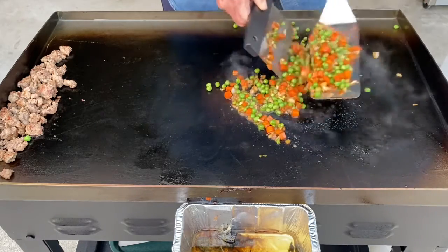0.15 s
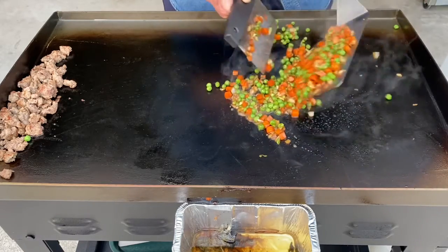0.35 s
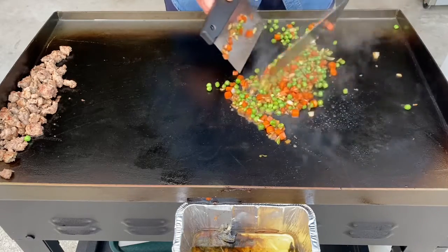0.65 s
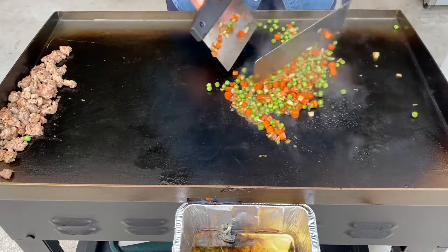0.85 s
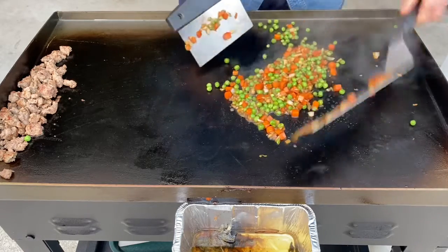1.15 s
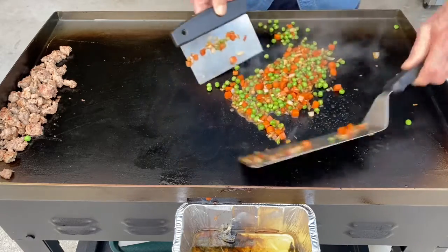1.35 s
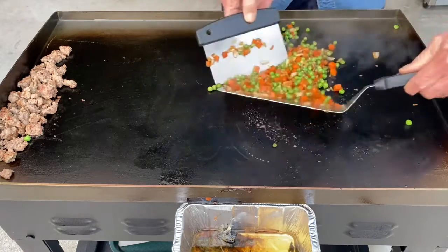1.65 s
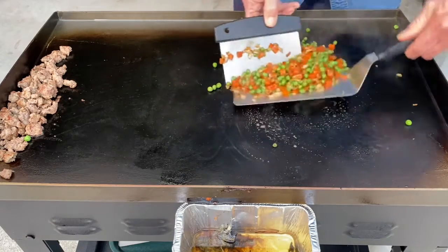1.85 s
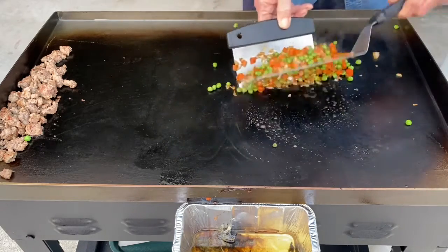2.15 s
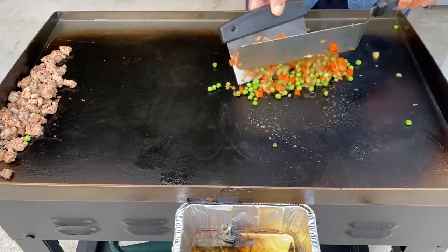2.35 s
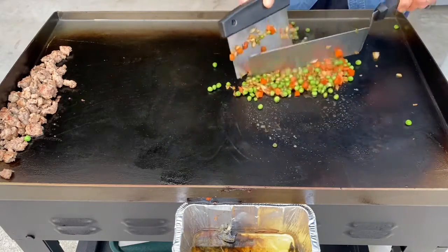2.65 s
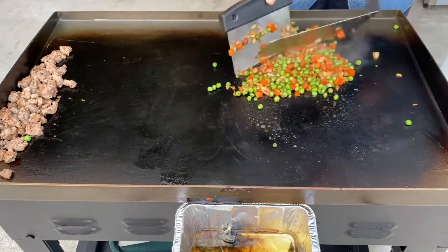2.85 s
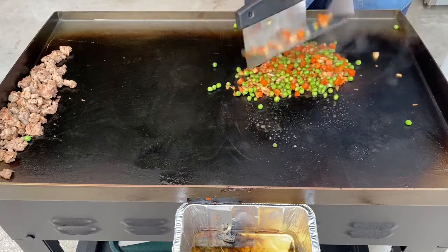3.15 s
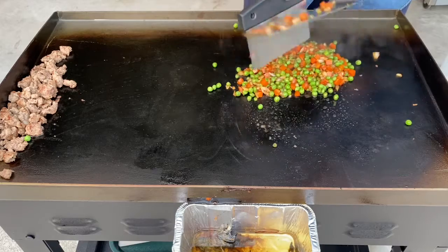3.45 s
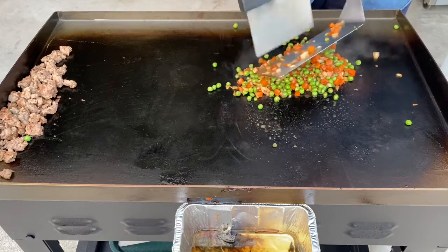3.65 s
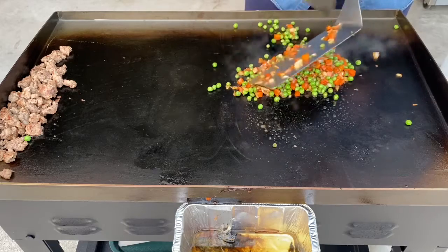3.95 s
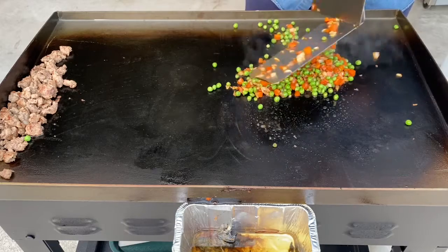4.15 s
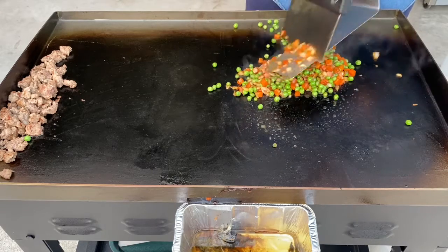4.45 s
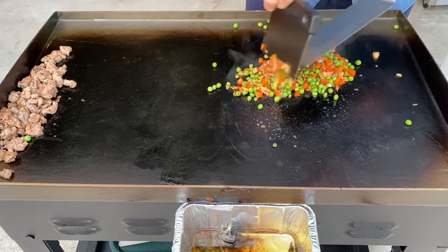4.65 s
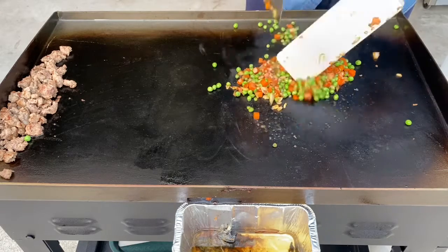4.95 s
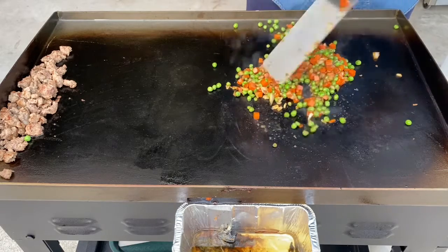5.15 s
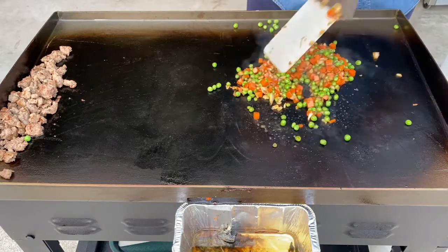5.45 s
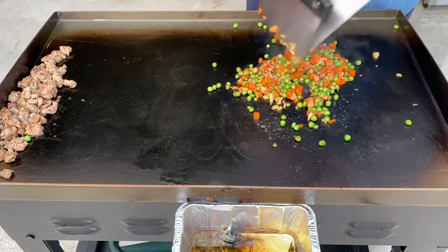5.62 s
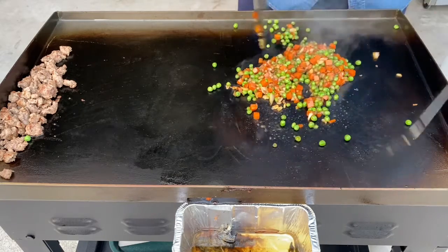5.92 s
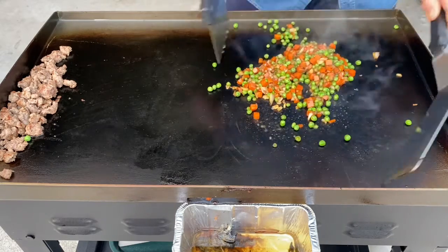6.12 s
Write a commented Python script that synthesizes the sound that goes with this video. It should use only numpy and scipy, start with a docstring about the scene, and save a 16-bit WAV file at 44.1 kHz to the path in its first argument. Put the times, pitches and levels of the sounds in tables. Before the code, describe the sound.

A close stereo pickup of an outdoor gas griddle. Steady steam hiss and fine fat crackle run throughout over a quiet, deep burner rumble, with dry pops scattered on top. The sizzle starts lively, with a flare at 0.2 seconds. At 1.2 a blade clanks down and a rough, gritty scrape begins, droning in the middle range, then squealing upward around 1.4 to 1.6; another clank lands at 1.75, with small slips until 2.0. The hiss thins as the food is heaped, flaring again near 2.5. Hard, short chops strike at 2.97 and, loudest, 3.4, with a faint tink and gritty swishes between. Drier taps come at 4.0 and 4.5, with thin tinks. Soft pats fall around 5, taps and tinks follow at 5.2 to 5.5, and two ringing steel clangs at 5.9 and 6.07 fade into sizzle and a last bright swish.

```python
"""Food sizzles on a gas flat-top griddle outdoors: steam hisses and fat crackles over a low burner rumble.
Then a long spatula and a bench scraper chop, scrape and tink; late on they clang on the ringing steel plate.
Hiss, crackle, rumble and scraping are noise filtered to a tone colour, made steady or in tiny bursts.
Blades and plate ring as sums of fading sine waves; a droning, squealing blade is a rough narrow tone."""
import sys
import numpy as np
from scipy import signal
from scipy.fft import rfft, irfft, next_fast_len
from scipy.io import wavfile
from scipy.ndimage import uniform_filter1d

SR = 44100
rng = np.random.default_rng(int(sys.argv[2]) if len(sys.argv) > 2 else 0)


def persist_wave(psi):
    """Save psi, clipped to +-1, as 16-bit WAV."""
    counts = np.round(np.clip(psi, -1, 1) * 32767).astype(np.int16)
    wavfile.write(sys.argv[1], SR, np.atleast_2d(counts).T)


N = 276931
T = np.arange(N) / SR

# In every table and name, t60 is the time in which a sound fades by 60 dB.
# Tone colours of noise; only their shapes matter: (frequency [Hz], level per Hz [dB])
BURNER_COLOUR = [(28, -43), (40, -11), (60, -5.5), (82, -0.5), (106, 0.5), (130, -1), (170, -8),
                 (260, -17.5), (500, -16), (1200, -25)]
STEAM_COLOUR = [(150, -8.5), (350, -5.5), (700, -4), (1200, -3), (2200, -0.5), (3300, -1), (5000, 1.5),
                (6200, 0.5), (8000, -2), (11000, -1.5), (16000, -7.5)]
FAT_COLOUR = [(300, -13), (1000, 1.5), (3000, -2), (5500, -5.5), (7000, 0.5), (11000, 1.5), (16000, 4)]
SCRAPE_COLOUR = [(120, -17), (300, 4), (600, -4), (750, 12.5), (900, -5), (1120, 6), (1600, 8), (2600, 3.5),
                 (4500, 1.5), (7000, -6.5), (10000, -28), (16000, -1)]
BLOW_COLOUR = [(60, -23), (150, -19), (300, -3), (600, 1.5), (1200, 0), (2000, -0.5), (3000, -4.5),
               (5000, -8.5), (8000, -6.5), (12000, -10.5), (16000, -22)]

# Turned food meets fresh hot steel and flares up: (time [s], steam level [dB], fat level [dB])
FLARES = [(.2, -45, -46), (2.47, -46, -45), (3.0, -57, -48.5), (4.02, -61, -45.5), (4.28, -65, -51.5),
          (5.22, -52, -44.5), (5.62, -56, -47), (6.05, -48, -47)]
# The loudest drops burst: (time [s], level before POP_GAIN_DB [dB])
POPS = [(0.6814, -26), (0.7913, -22), (2.4605, -25.5), (2.4968, -24.5), (2.6913, -24.5), (2.7766, -29),
        (3.5103, -27.5), (3.714, -27), (4.148, -33), (4.3116, -26.5), (4.4819, -24), (4.9555, -25)]
# Tossed pieces land softly on the plate: (time [s], level before a shared lift of 4 dB [dB])
PIECES = [(4.909, -43.5), (4.924, -49), (5.022, -44), (5.822, -37), (5.852, -43.5)]
# The edge slips through wet food or squeaks on steel:
# (middle time [s], level [dB], length [s], centre frequency [Hz])
SLIPS = [(1.84, -41, 0.03, 3200), (1.892, -36.5, .009, 2820), (1.944, -40, 0.014, 3070),
         (2.032, -43.5, 0.018, 2650), (3.039, -44.5, 0.039, 6260), (3.118, -37, .028, 14000),
         (3.45, -37, 0.075, 6700), (3.485, -44, 0.0049, 6850), (4.513, -45, .038, 7000),
         (6.275, -36.5, 0.055, 9100)]
# Ringing of the steel plate and, from 4995 Hz up, of the blade that strikes it:
# (frequency [Hz], level [dB], t60 [s])
STEEL_MODES = [(256, -4, .75), (452, -13, .7), (488, -7, .55), (603, -7, .36), (678, -6, .45),
               (737, -3, .45), (795, -9, .95), (899, -9, .45), (942, -10, .5), (1039, -13, .6),
               (1120, -3, .55), (1219, -1, .5), (1270, -2, .42), (1357, -4, .45), (1410, -5, .35),
               (1497, -5, .4), (1640, -4, .4), (1876, -7, .42), (2369, -14, .3), (3278, -17, .27),
               (3688, -16, .22), (4995, -8, .15), (7540, 0, .13), (8344, -2, .13), (9210, 0, .13)]
# Ringing of the blades when free: (frequency [Hz], level [dB], t60 [s])
SPATULA_MODES = [(1210, -10.5, 0.21), (1520, -18, 0.29), (1955, -3.5, 0.68), (3010, 0, 0.11),
                 (4870, -5.5, 0.17), (6960, 1, 0.19), (7400, -8.5, 0.18), (9400, 6, 0.13), (9530, 5, 0.062),
                 (11000, 2, 0.062), (13100, 3, 0.082)]
SCRAPER_MODES = [(1446, -4.5, 0.33), (2390, -0.5, 0.38), (6400, -6, 0.16), (9800, 5.5, 0.17),
                 (15500, 12, .05)]
# Blade touches blade: (time [s], click level [dB], spatula ring level [dB], scraper ring level [dB])
TINKS = [(3.131, -26.5, -70, -40), (4.532, -30, -58, -57), (4.547, -28, -34.5, -60), (5.523, -25, -40, -49),
         (5.547, -30, -37.5, -60)]
# A blade meets the plate; held against it, the blade gives a knock and a higher zing:
# (time [s], level [dB], bass tilt [dB], treble tilt [dB], edge tick level [dB], basic t60 [s],
#  knock [Hz], zing [Hz], pressed share [0-1], steel ring level [dB], rebound delay [s], 0 for none)
# All levels after the first are relative to the blow.
BLOWS = [ (1.193, -25.5, 1, 6.5, -4.5, 0.2, 1870, 4550, 0.03, -14.5, .03),
         (1.743, -23, -5.5, -7.5, -3, 0.31, 2020, 4040, 0.17, -13, 0.0011),
         (2.321, -40.5, -1, 10.5, -3, 0.14, 977, 2770, 0.07, -18, 0),
         (2.9714, -16, -1.5, 3.5, 11, 0.058, 498, 3180, 0.5, -31.5, .0105),
         (3.395, -12.3, -3, -0.5, 1, 0.054, 710, 6810, 0.41, -34, 0.011),
         (3.9894, -23.5, -4.5, 1.5, 12, 0.16, 1012, 10950, 0.53, -35, 0),
         (4.529, -30, -15.5, 0.5, 14, 0.19, 757, 1380, 0.36, -18, 0.0011),
         (5.193, -28, -3, 2.5, 14, 0.18, 410, 3480, 0.62, -37, 0),
         (5.252, -34.5, 5.5, 5.5, -8, 0.12, 1180, 2240, 0.46, -42, 0),
         (5.923, -17.5, 2, -8.5, -0.5, 0.28, 745, 1150, 0.01, -7.5, .02),
         (6.066, -18.5, -4, 7.5, -9, 0.25, 1103, 4440, 0.08, -6, .01)]
# A blade pressed edge-on to the plate: (frequency [Hz], level [dB])
PRESSED_MODES = [(475, -9.5), (640, -7), (1035, -1), (1270, -5), (2150, -6.5), (2800, -9.5), (3500, -8.5)]
# Strength of the difference between left and right: (frequency [Hz], level [dB])
WIDTH = [(60, -17.5), (300, -10), (800, -3.5), (2000, -2.5), (5500, 2.5), (6600, -4), (8000, 0),
         (9000, -18), (10000, 3), (11000, -19), (16000, 2)]
# Bands across which the two channels slip half a cycle apart: (start [Hz], end [Hz])
HALF_TURNS = [(7450, 8700), (9500, 10500), (11600, 12700), (13700, 14700)]

# The vegetables lie spread out, then are gathered into a heap that touches less steel and slowly dries.
# Starting levels, before the mix in sizzle(), and the change that the heap brings
STEAM_DB, FAT_DB = -40, -44
HEAP_STEAM_DB, HEAP_FAT_DB, DRYING_DB_PER_S = -9.5, -1.5, -0.76
GATHER_START_S, GATHER_LENGTH_S = 1.37, 0.9
FLARE_RISE_S, FLARE_T60_S = 0.078, 3.1
POP_GAIN_DB, SMALL_POPS_PER_S, SMALL_POP_DB = -2, 2.5, -33
SLIP_WIDTH_SHARE = 1  # of the centre frequency

# One long stroke of the spatula under the pile: it bears down, eases off steadily and lifts
STROKE_START_S, STROKE_ATTACK_S, STROKE_LENGTH_S, STROKE_RELEASE_T60_S = 1.189, 0.12, 0.34, 0.26
STROKE_DB, STROKE_SAG_DB_PER_S = -32.5, -34
# The wet film that it smears out boils off; levels relative to the stroke
FILM_STEAM_DB, FILM_FAT_DB = -1.5, -6
DRONE_HZ, DRONE_WIDTH_HZ, DRONE_DB = 766, 24, -31.5
DRONE_SAG_DB_PER_S, DRONE_RELEASE_T60_S = -53, 0.12
# Late in the stroke a squeal rises in pitch and swells
SQUEAL_START_S, SQUEAL_LENGTH_S = 1.42, 0.13
SQUEAL_HZ, SQUEAL_RISE_HZ_PER_S, SQUEAL_WIDTH_HZ = 1250, 2900, 80
SQUEAL_DB, SQUEAL_SWELL_DB_PER_S = -43.5, 70

BLOW_PAN_DB = 2  # left louder than right
KNOCK_DB, ZING_DB = -3, -6  # relative to the blow
# After a rebound the blow is softer and duller and rings longer, at two pitches near strong plate modes
REBOUND_DB, REBOUND_TREBLE_DB, REBOUND_TICK_DB, REBOUND_T60_RATIO = -6.5, -6, -6, 1.8
REBOUND_KNOCK_HZ, REBOUND_ZING_HZ = 784, 1138
# The grip shifts the pressed modes together a little from blow to blow
GRIP_DETUNE_SHARE, PRESSED_T60_RATIO = 0.012, 0.75
TOP_HZ = 15800  # upper limit of the microphone sound


def db_to_gain(db):
    """Turn decibels into a gain."""
    return 10 ** (np.asarray(db) / 20)


def gain_curve(points, hz):
    """Read a gain off a (frequency, dB) outline at the given frequencies."""
    point_hz, point_db = np.transpose(points)
    return db_to_gain(np.interp(np.log(hz + 1), np.log(point_hz), point_db))


def colour(sound, gain_at):
    """Filter by a gain that depends on frequency, keeping the power of white noise."""
    length = sound.shape[-1]
    size = next_fast_len(length)
    gain = gain_at(np.fft.rfftfreq(size, 1 / SR))
    gain = gain / np.sqrt(np.mean(gain ** 2))
    return irfft(rfft(sound, size) * gain, size)[..., :length]


def pair(mid, side):
    """Make left and right from their shared part (mid) and their difference part (side)."""
    return np.vstack([mid + side, mid - side])


def noise(size, spread):
    """Make white noise in two channels that are partly unrelated."""
    return pair(rng.standard_normal(size), spread * rng.standard_normal(size))


def wander(rate):
    """Drift at random, with about `rate` new values per second and a spread near 1."""
    step = max(int(SR / rate), 1)
    values = np.repeat(rng.standard_normal(N // step + 1), step)
    return 1.52 * uniform_filter1d(values, step)[:N]


def fade(t, t60):
    """Die away exponentially, by 60 dB in t60 seconds."""
    return np.exp(-np.log(1000) * t / t60)


def add(out, start_s, sound):
    """Mix a short sound in at a given time."""
    i = max(int(start_s * SR), 0)
    out[:, i:i + sound.shape[1]] += sound[:, :max(N - i, 0)]


def ring(modes, t, spread):
    """Sum fading sine waves; mode levels and left-right timing vary by chance with each contact."""
    hz, db, t60 = np.transpose(modes)[:, :, None]
    scatter_db, lag = rng.standard_normal((len(modes), 2)).T[:, :, None]
    swing = db_to_gain(db + scatter_db) * fade(t, t60)
    phase = 2 * np.pi * hz * t
    shift = spread * np.sign(lag)
    left = np.sum(swing * np.sin(phase + shift), axis=0)
    right = np.sum(swing * np.sin(phase - shift), axis=0)
    return np.array([left, right])


def crackle(rate, range_db, t60, spread):
    """Make a swarm of tiny noise bursts, `rate` per second, of uneven strength; rms near 1."""
    strength = db_to_gain(range_db * np.minimum(rng.exponential(size=N), 5))
    power = (rng.random(N) < rate / SR) * strength ** 2
    # power falls twice as fast in decibels as amplitude, hence 2 / SR
    power = signal.lfilter([1], [1, -fade(2 / SR, t60)], power)
    return noise(N, spread) * np.sqrt(power / power.mean())


def ripple(f, depth_db):
    """Peaks and valleys of crowded steel modes, wider and deeper toward the treble; mean power 1."""
    height = np.clip(rng.standard_normal(160), -1.8, 1.8)
    outline = np.interp(np.sqrt(f), np.arange(len(height)), height)
    gain = db_to_gain(depth_db * f / (f + 900) * outline)
    return gain / np.sqrt(np.mean(gain ** 2))


def gesture(start_s, attack_s, length_s, sag_db_per_s, release_t60):
    """Gain that rises, sags (or swells) steadily and dies away from length_s after the start."""
    t = np.maximum(T - start_s, 0)
    rise = np.minimum(t / attack_s, 1)
    sag = db_to_gain(sag_db_per_s * np.clip(t - attack_s, 0, length_s))
    return rise * sag * fade(np.maximum(t - length_s, 0), release_t60)


def stroke():
    """Force of the long spatula stroke, as a gain."""
    force = gesture(STROKE_START_S, STROKE_ATTACK_S, STROKE_LENGTH_S,
                    STROKE_SAG_DB_PER_S, STROKE_RELEASE_T60_S)
    return db_to_gain(STROKE_DB) * force


def burners():
    """The gas flames rumble under the plate: deep noise whose level wavers slightly."""
    rumble = colour(noise(N, 1.0), lambda f: gain_curve(BURNER_COLOUR, f))
    return rumble * db_to_gain(-53.0 + 0.78 * wander(5.2))


def frying(spread_db, heap_db, film_db, flares):
    """Strength of the frying: the pile, the film behind the spatula and each flare add in power."""
    gathered = np.clip((T - GATHER_START_S) / GATHER_LENGTH_S, 0, 1)
    drying_db = DRYING_DB_PER_S * np.maximum(T - GATHER_START_S, 0)
    pile = db_to_gain(spread_db + heap_db * gathered + drying_db)
    film = db_to_gain(film_db) * stroke()
    flare_power = 0
    for start_s, db in flares:
        flare = db_to_gain(db) * gesture(start_s, FLARE_RISE_S, FLARE_RISE_S, 0, FLARE_T60_S)
        flare_power = flare_power + flare ** 2
    return np.sqrt(pile ** 2 + film ** 2 + flare_power)


def sizzle():
    """Water boils off under the vegetables as a dense hiss; fat spits in bursts that flicker faster."""
    boiling = frying(STEAM_DB, HEAP_STEAM_DB, FILM_STEAM_DB, [(s, db) for s, db, _ in FLARES])
    spitting = frying(FAT_DB, HEAP_FAT_DB, FILM_FAT_DB, [(s, db) for s, _, db in FLARES])
    steam = noise(N, 0.4) + db_to_gain(-2) * crackle(rate=1400, range_db=3, t60=0.005, spread=0.4)
    fat = noise(N, 0.35) + db_to_gain(2) * crackle(rate=1200, range_db=3.9, t60=0.005, spread=0.35)
    steam = colour(steam, lambda f: gain_curve(STEAM_COLOUR, f))
    fat = colour(fat, lambda f: gain_curve(FAT_COLOUR, f))
    steam = steam * boiling * db_to_gain(0.47 * wander(11.0))
    fat = fat * spitting * db_to_gain(1.57 * wander(22.33))
    # the steam is mixed lower, and leans to the left
    return steam * pair(0.66, 0.094) + fat


def pops():
    """Larger drops burst with a dry tick, each with its own brightness; smaller ones come by chance."""
    out, t = np.zeros((2, N)), T[:1024]
    large = [(s, db + POP_GAIN_DB) for s, db in POPS]
    small = [(s, SMALL_POP_DB) for s in T[rng.random(N) < SMALL_POPS_PER_S / SR]]
    for start_s, db in large + small:
        hz = 7500 * np.exp(0.3 * rng.standard_normal())
        burst = noise(len(t), 0.83) * fade(t, 0.0092)
        tick = colour(burst, lambda f: np.sqrt(f * hz / (f ** 2 + hz ** 2)))
        add(out, start_s, db_to_gain(db) * tick)
    return out


def pieces():
    """Soft, wet cubes and peas land with a dull pat each: a short noise burst around 1000 Hz."""
    out, t = np.zeros((2, N)), T[:2048]
    for start_s, db in PIECES:
        burst = noise(len(t), 0.53) * fade(t, 0.02)
        pat = colour(burst, lambda f: 1 / (1 + ((f - 1000) / 550) ** 2))
        add(out, start_s, db_to_gain(db + 4) * pat)
    return out


def slips():
    """Short gritty swishes, coloured by the blade, as it slides under the food."""
    out, t = np.zeros((2, N)), T[:12000]
    middle = t[-1] / 2
    grit = crackle(rate=530, range_db=1.5, t60=0.011, spread=0.41)
    for k, (middle_s, db, length_s, hz) in enumerate(SLIPS):
        width_hz = SLIP_WIDTH_SHARE * hz
        piece = grit[:, k * len(t):(k + 1) * len(t)]
        swish = colour(piece, lambda f: ripple(f, depth_db=5) / (1 + (2 * (f - hz) / width_hz) ** 2))
        swell = np.exp(-(2 * (t - middle) / length_s) ** 2)
        add(out, middle_s - middle, db_to_gain(db) * swish * swell)
    return out


def scrape():
    """The edge catches and slips on the seasoned steel in a swarm of bursts and sets the steel ringing."""
    grit = crackle(rate=1200, range_db=-0.5, t60=0.014, spread=0.62)
    grit = grit * stroke() * db_to_gain(2.5 * wander(44.73))
    rasp = colour(grit, lambda f: gain_curve(SCRAPE_COLOUR, f) * ripple(f, depth_db=4.5))
    # the blade lying on the plate shortens its ring
    t = T[:16000]
    body = ring(STEEL_MODES, t, spread=0.2) * fade(t, 0.66)
    body = body / np.sqrt(np.sum(body ** 2, axis=1, keepdims=True))
    steel = signal.fftconvolve(rasp, body, axes=1)[:, :N]
    return rasp + db_to_gain(-11.5) * steel


def rubbed(hz, width_hz):
    """A blade resonance fed by friction: a rough tone whose pitch may move."""
    def slow_noise():
        return colour(noise(N, 0.32), lambda f: 1 / (1 + (2 * f / width_hz) ** 2))
    phase = 2 * np.pi * np.cumsum(hz * np.ones(N)) / SR
    return (slow_noise() * np.cos(phase) + slow_noise() * np.sin(phase)) / np.sqrt(2)


def singing():
    """The dragged blade drones, then squeals upward as it slides under the pile."""
    drone_gain = gesture(STROKE_START_S, 0.02, STROKE_LENGTH_S, DRONE_SAG_DB_PER_S, DRONE_RELEASE_T60_S)
    drone = rubbed(DRONE_HZ, DRONE_WIDTH_HZ) * drone_gain
    squeal_t = np.clip(T - SQUEAL_START_S, 0, SQUEAL_LENGTH_S)
    squeal_hz = SQUEAL_HZ + SQUEAL_RISE_HZ_PER_S * squeal_t
    squeal_gain = gesture(SQUEAL_START_S, 0.02, SQUEAL_LENGTH_S, SQUEAL_SWELL_DB_PER_S, 0.092)
    squeal = rubbed(squeal_hz, SQUEAL_WIDTH_HZ) * squeal_gain
    return db_to_gain(DRONE_DB) * drone + db_to_gain(SQUEAL_DB) * squeal


def tinks():
    """The blades touch in the air to shed food and ring freely after a short click."""
    out, t = np.zeros((2, N)), T[:24000]
    for start_s, click_db, spatula_db, scraper_db in TINKS:
        # a thin free blade radiates little bass
        click = colour(noise(len(t), 0.3), lambda f: f / (f + 2500)) * fade(t, 0.059)
        spatula = db_to_gain(spatula_db) * ring(SPATULA_MODES, t, spread=0.69)
        scraper = db_to_gain(scraper_db) * ring(SCRAPER_MODES, t, spread=0.28)
        add(out, start_s, db_to_gain(click_db) * click + spatula + scraper)
    return out


def clash(t, t60, tilt):
    """The crowd of short modes of blade and plate, as noise in half-octave bands; the high ones die first."""
    edges = 60 * 2 ** (np.arange(18) / 2)
    f = np.fft.rfftfreq(len(t), 1 / SR)
    gain = gain_curve(BLOW_COLOUR, f)
    gain = gain / np.sqrt(np.mean(gain ** 2))
    gain = gain * gain_curve(tilt, f) * ripple(f, depth_db=6)
    spectrum = rfft(noise(len(t), 0.56)) * gain
    crowd = np.zeros((2, len(t)))
    for low, high in zip(edges, edges[1:]):
        band = irfft(spectrum * (f >= low) * (f < high), len(t))
        crowd += band * fade(t, t60 * min(1100 / low, 1) ** 0.38)
    # a little extra strength at the very start
    return crowd * (1.106 + 0.22 * fade(t, 0.0092))


def strike(bass_db, treble_db, tick_db, t60, knock_hz, zing_hz, pressed_share, ring_db):
    """One contact: an edge tick, a clash that gives way to clear modes if pressed, knock, zing, steel ring."""
    t = T[:26000]
    # a soft, flat contact favours the low modes, a hard edge the high ones
    tilt = [(350, bass_db), (1200, 0), (5500, treble_db)]

    def tilt_db(hz):
        return 20 * np.log10(gain_curve(tilt, hz))

    tick = colour(noise(len(t), 0.37), lambda f: f / (f + 12000)) * fade(t, 0.021)
    grip = 1 + GRIP_DETUNE_SHARE * rng.standard_normal()
    pressed_modes = [(hz * grip, db + tilt_db(hz), PRESSED_T60_RATIO * t60) for hz, db in PRESSED_MODES]
    pressed = ring(pressed_modes, t, spread=0.46)
    share = np.clip(pressed_share, 0, 1)
    body = np.sqrt(1 - share) * clash(t, t60, tilt) + np.sqrt(share) * pressed
    knock_zing = ring([(knock_hz, KNOCK_DB, 0.7 * t60), (zing_hz, ZING_DB, 0.63 * t60)], t, spread=0.37)
    steel_modes = [(hz, db + ring_db + tilt_db(hz), mode_t60) for hz, db, mode_t60 in STEEL_MODES]
    steel = ring(steel_modes, t, spread=0.7)
    contact = 1 - fade(t, 0.0073)  # the sound sets in over a few milliseconds
    return (db_to_gain(tick_db) * tick + body + knock_zing + steel) * contact


def blows():
    """The blades chop and clang on the plate; some blows rebound and land a second time."""
    out = np.zeros((2, N))
    for (start_s, db, bass_db, treble_db, tick_db, t60,
         knock_hz, zing_hz, pressed_share, ring_db, rebound_s) in BLOWS:
        first = strike(bass_db, treble_db, tick_db, t60, knock_hz, zing_hz, pressed_share, ring_db)
        add(out, start_s, db_to_gain(db) * first)
        if rebound_s > 0:
            again = strike(bass_db, treble_db + REBOUND_TREBLE_DB, tick_db + REBOUND_TICK_DB,
                           t60 * REBOUND_T60_RATIO, REBOUND_KNOCK_HZ, REBOUND_ZING_HZ,
                           pressed_share, ring_db)
            add(out, start_s + rebound_s, db_to_gain(db + REBOUND_DB) * again)
    return out * db_to_gain(pair(0, BLOW_PAN_DB / 2))


def scene():
    """Everything on and under the griddle, from the background to the blows."""
    background = burners() + sizzle() + pops() + pieces()
    blades = slips() + scrape() + singing() + tinks() + blows()
    return background + blades


def record(dry):
    """A close microphone pair: narrow in the bass, the treble turning in phase between the two."""
    size = next_fast_len(N + 4096)
    f = np.fft.rfftfreq(size, 1 / SR)
    left, right = rfft(dry, size)
    side = (left - right) / 2 * gain_curve(WIDTH, f)
    both = pair((left + right) / 2, side)
    turn = np.pi * sum(np.clip((f - low) / (high - low), 0, 1) for low, high in HALF_TURNS)
    # half of the turn goes to each channel, in opposite directions
    heard = irfft(both * np.exp(1j * pair(0, -turn / 2)), size)[:, :N]
    treble_cut = signal.ellip(10, 0.2, 70, TOP_HZ, fs=SR, output="sos")
    return signal.sosfilt(treble_cut, heard)


dry = scene()
out = record(dry)
persist_wave(out)
```